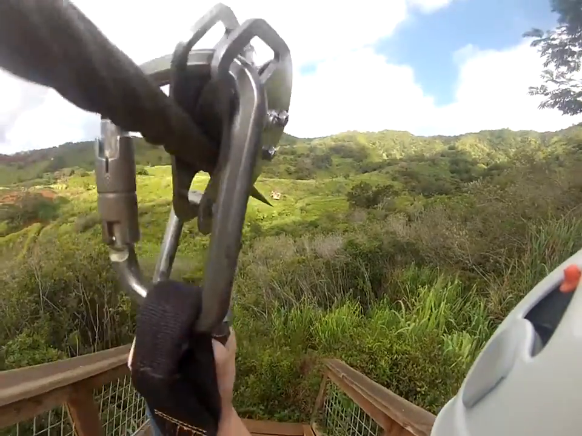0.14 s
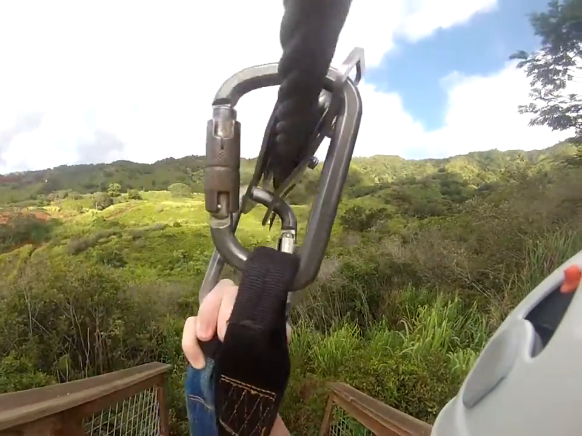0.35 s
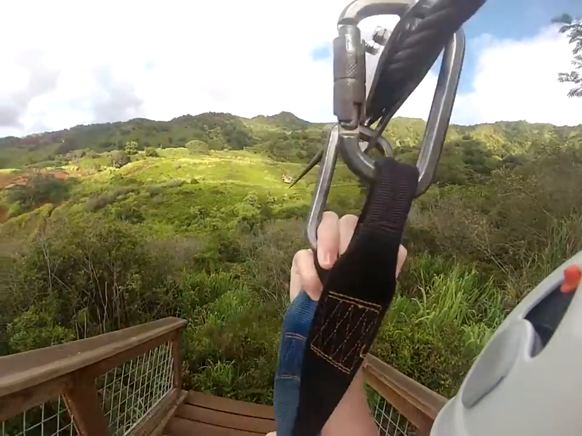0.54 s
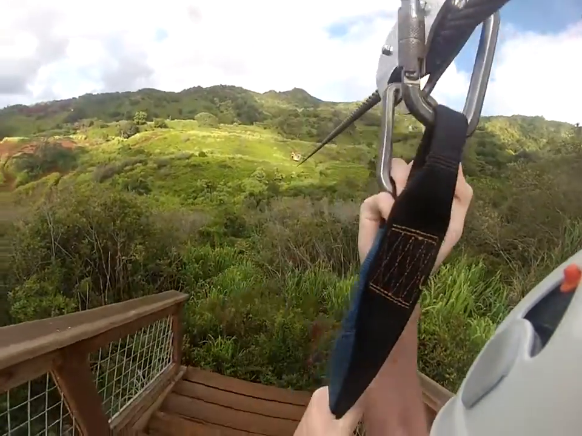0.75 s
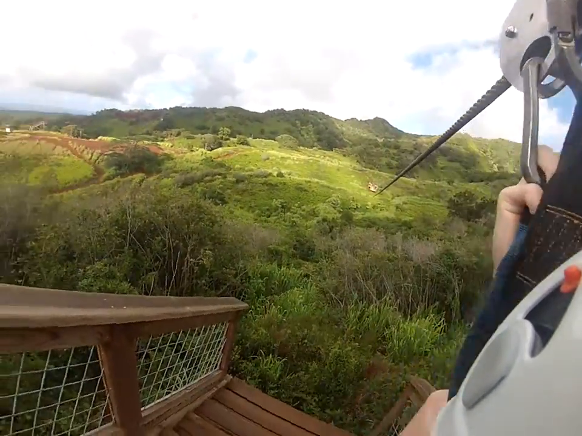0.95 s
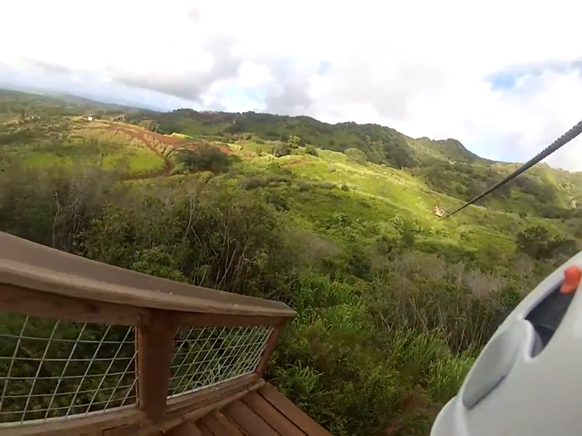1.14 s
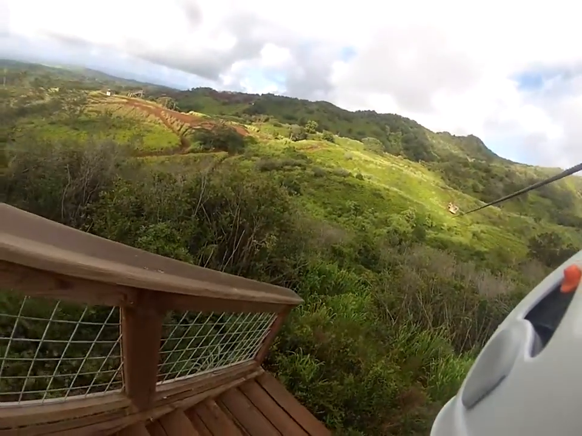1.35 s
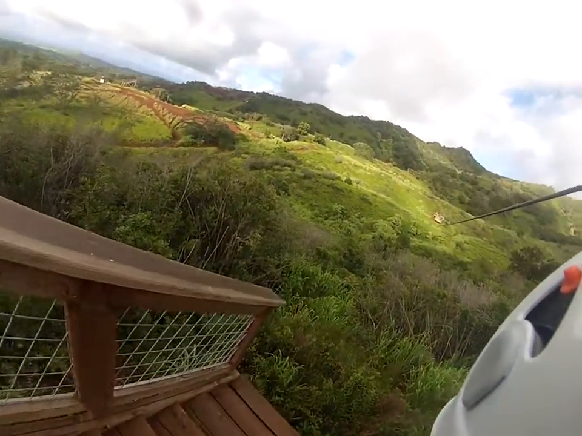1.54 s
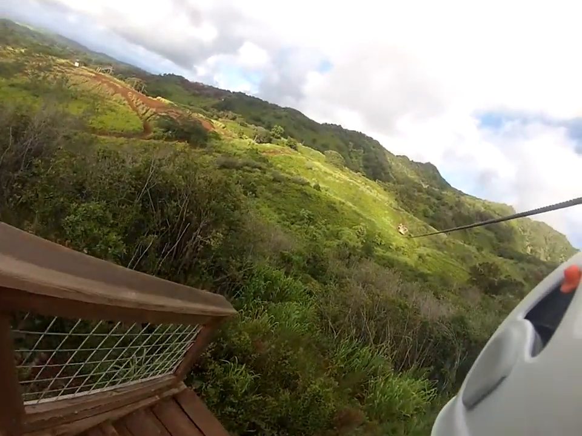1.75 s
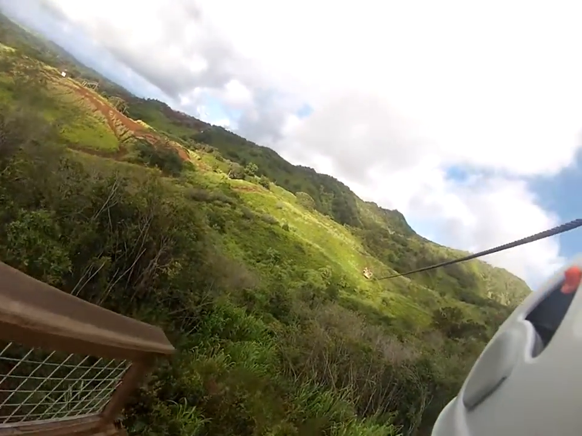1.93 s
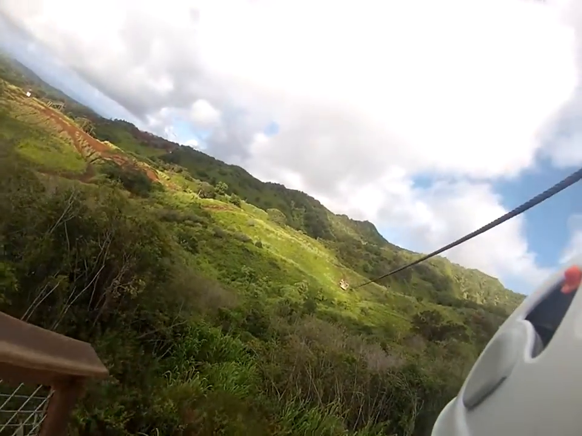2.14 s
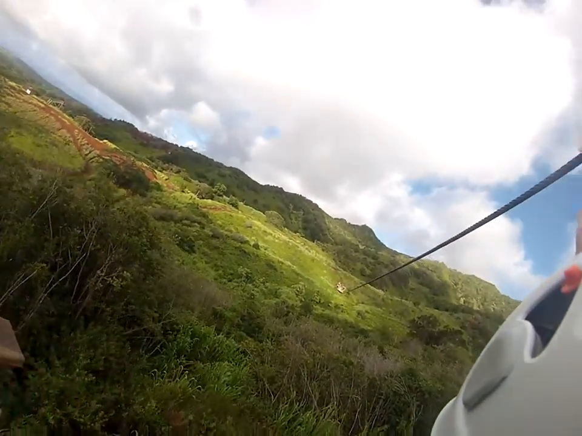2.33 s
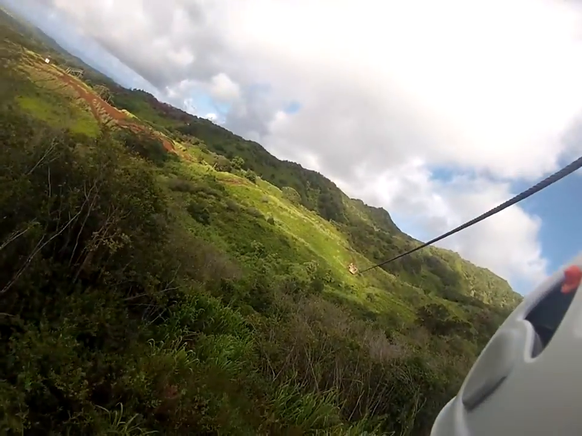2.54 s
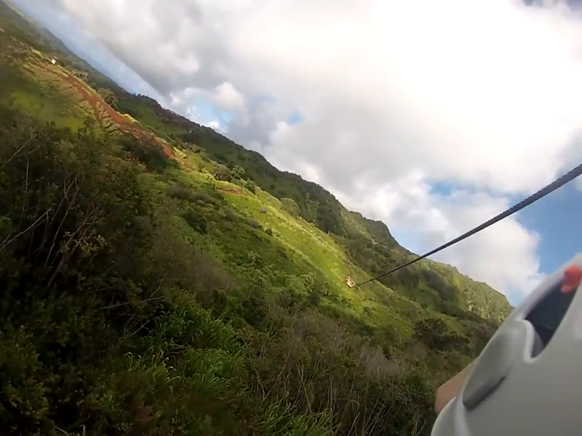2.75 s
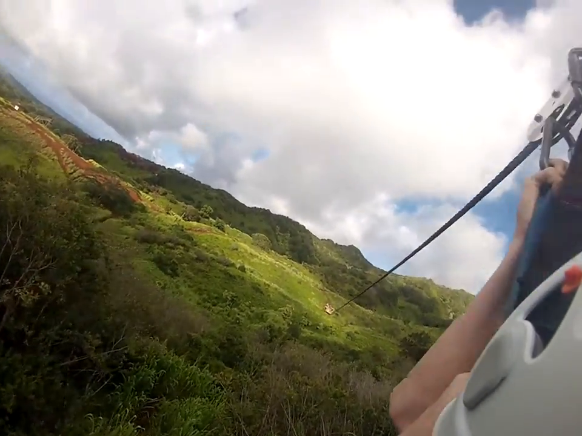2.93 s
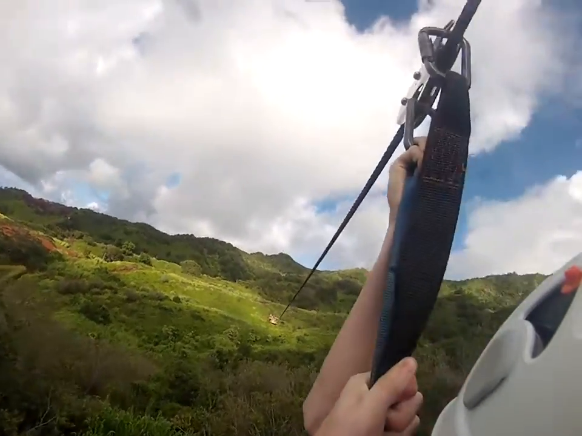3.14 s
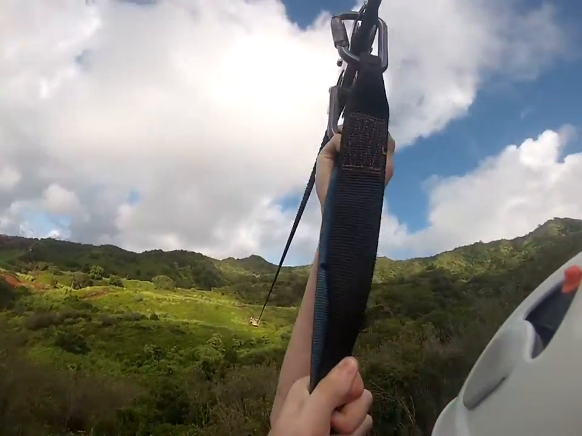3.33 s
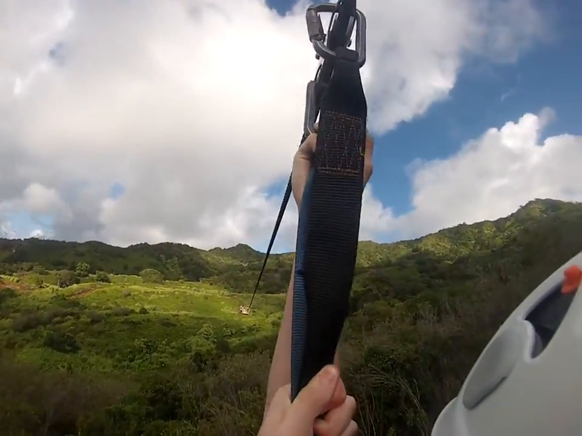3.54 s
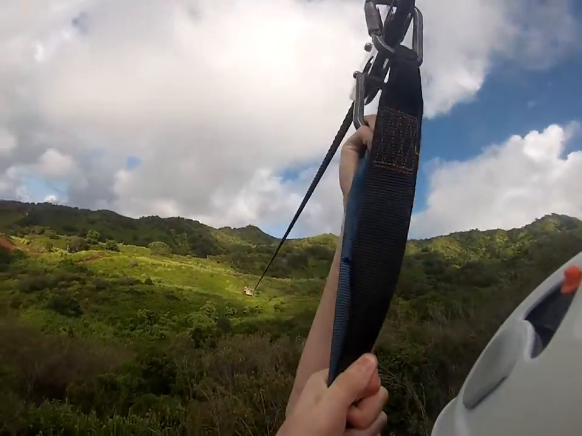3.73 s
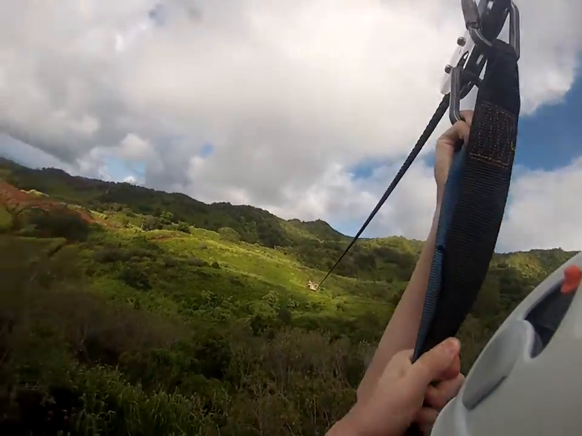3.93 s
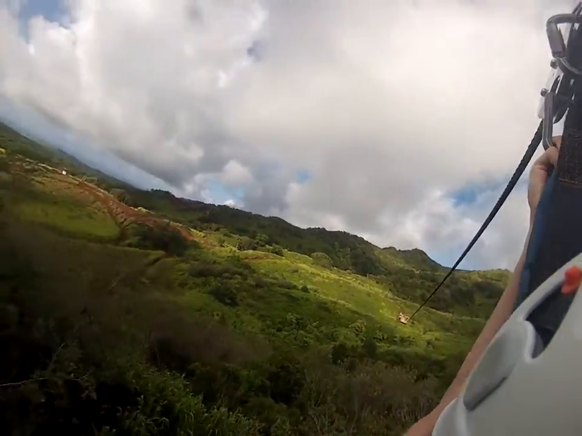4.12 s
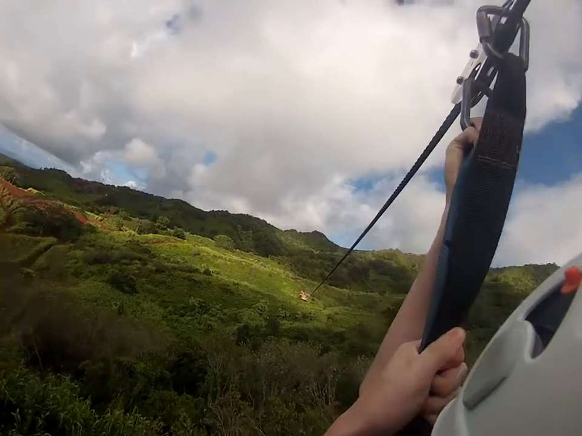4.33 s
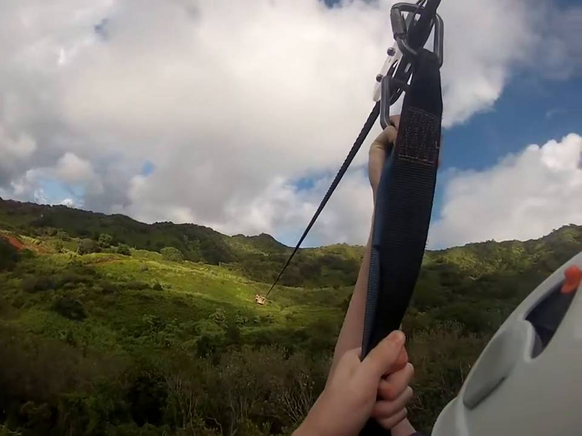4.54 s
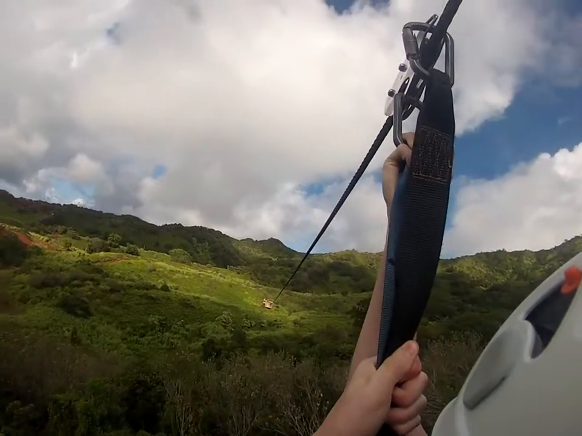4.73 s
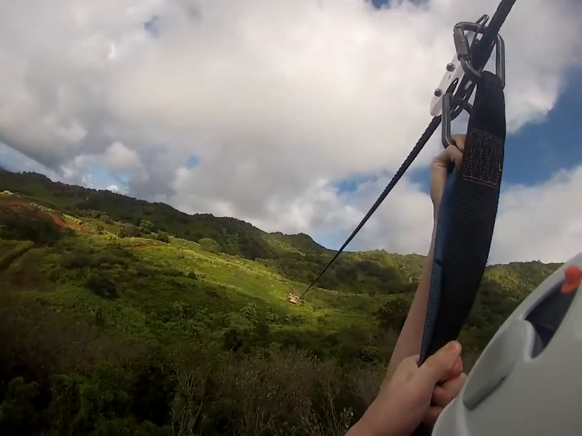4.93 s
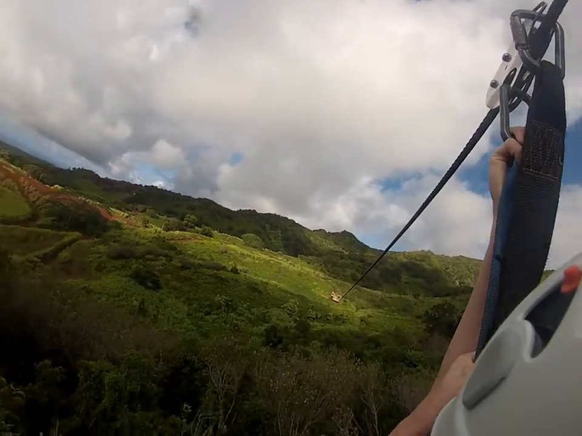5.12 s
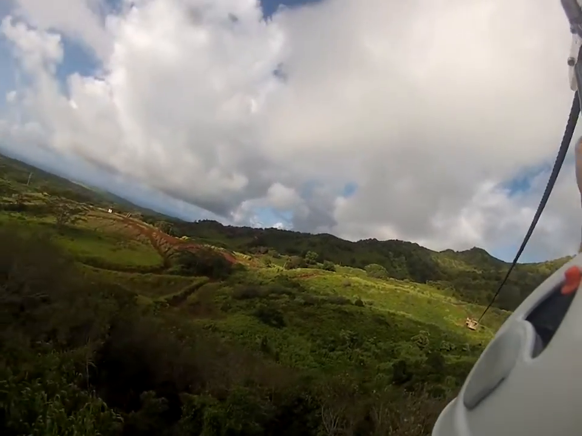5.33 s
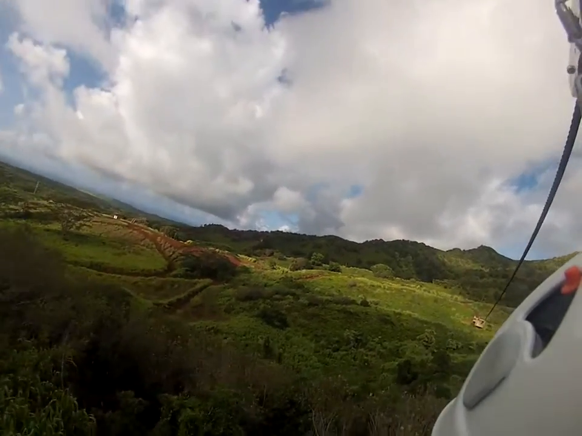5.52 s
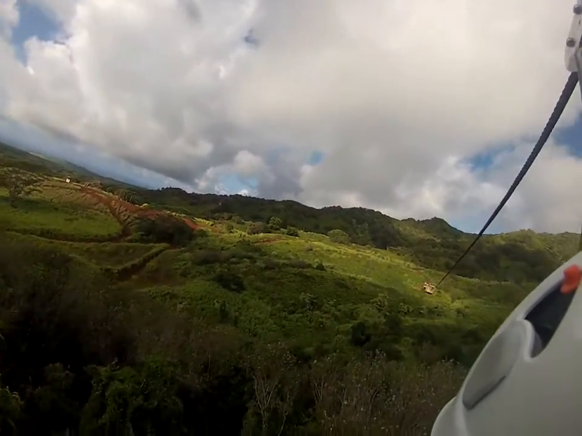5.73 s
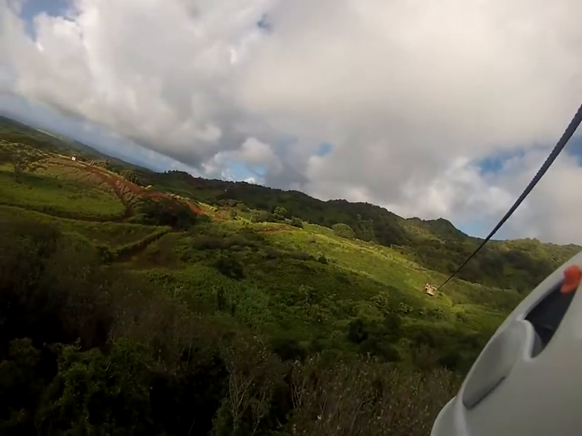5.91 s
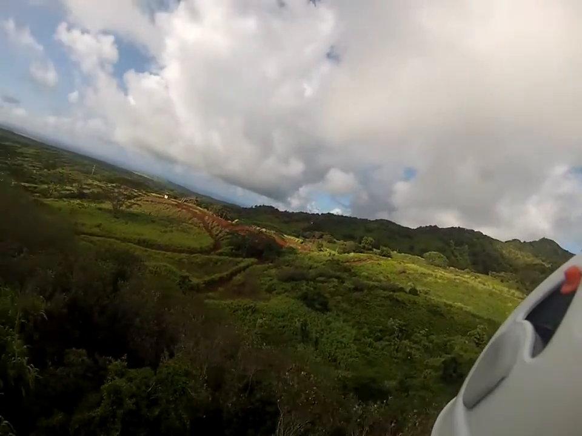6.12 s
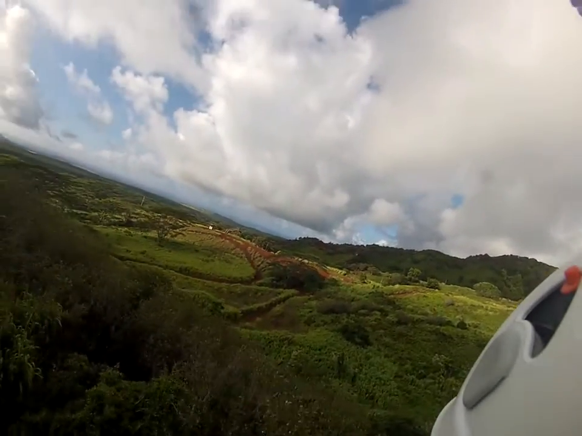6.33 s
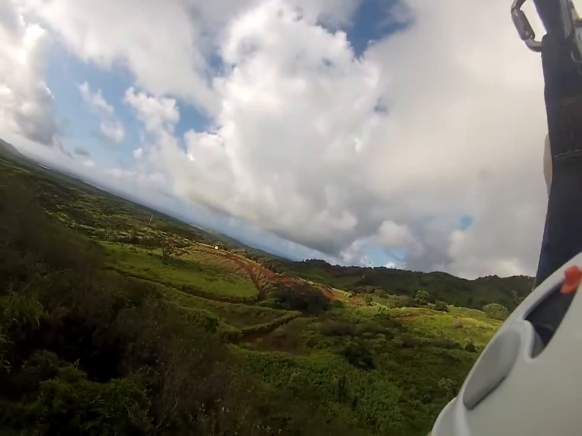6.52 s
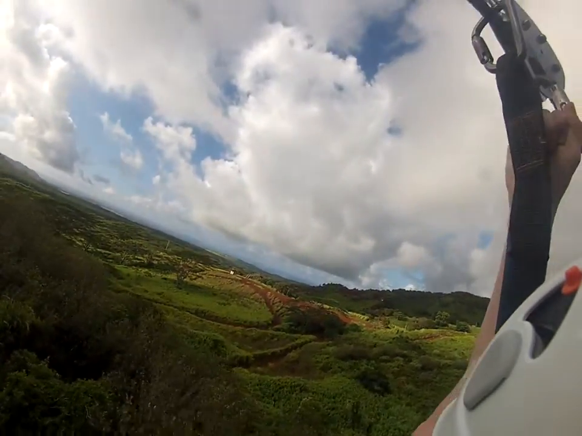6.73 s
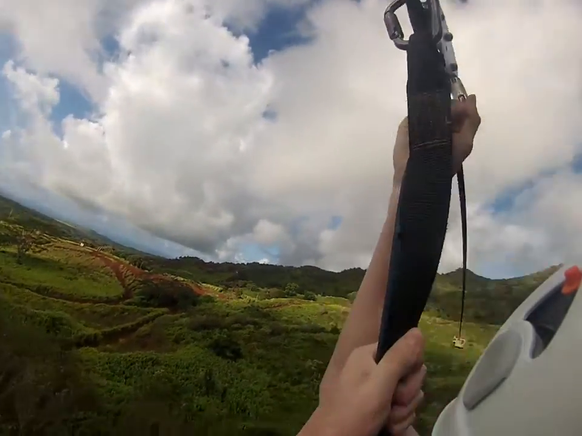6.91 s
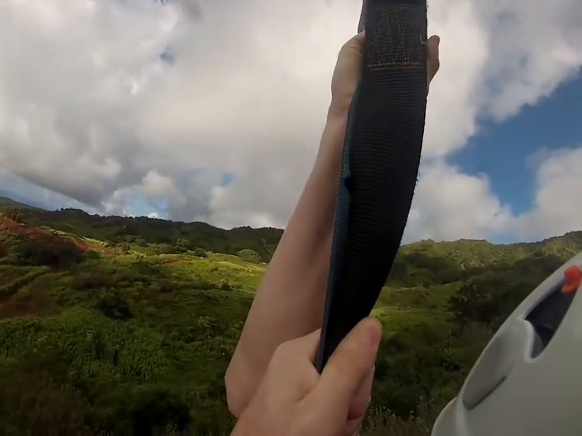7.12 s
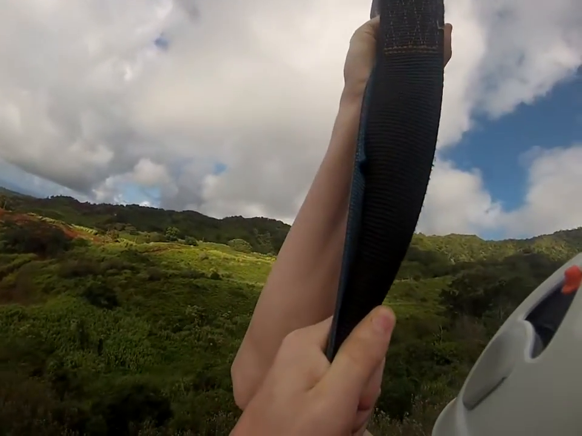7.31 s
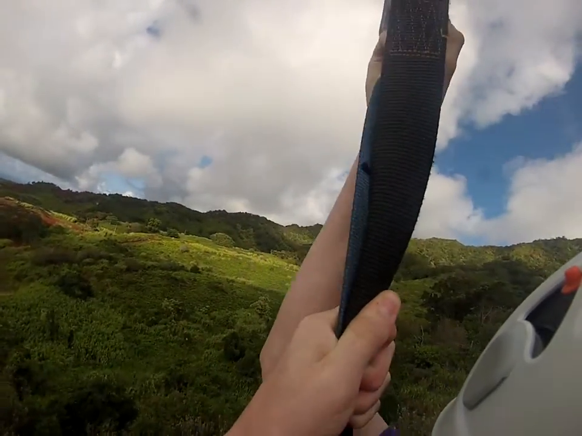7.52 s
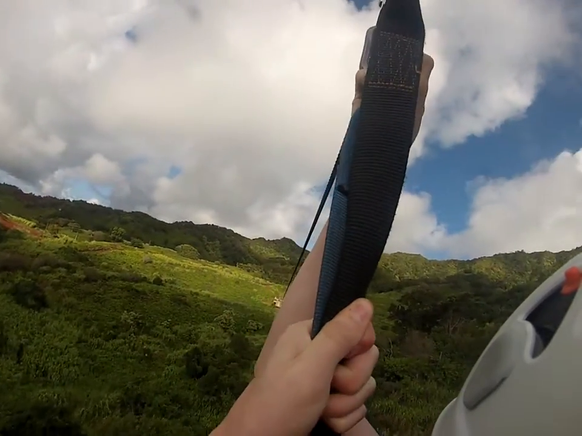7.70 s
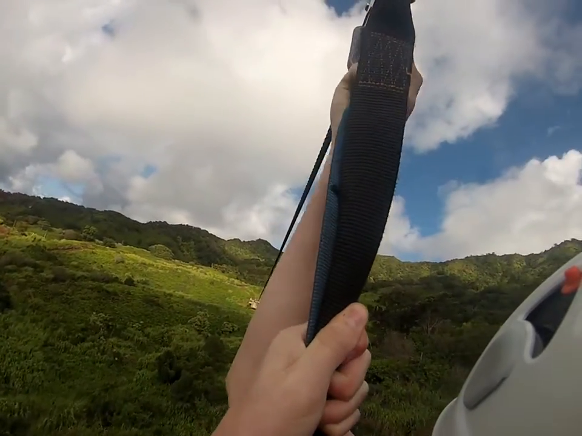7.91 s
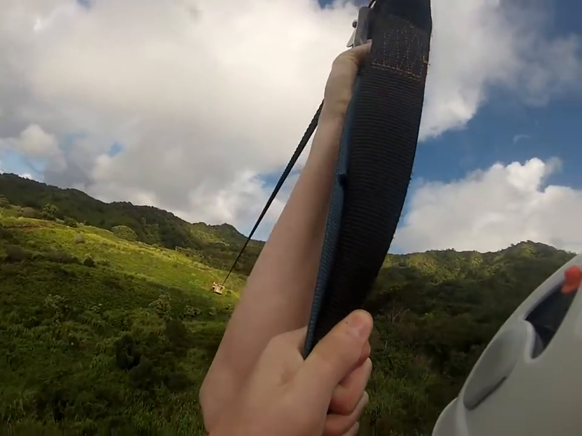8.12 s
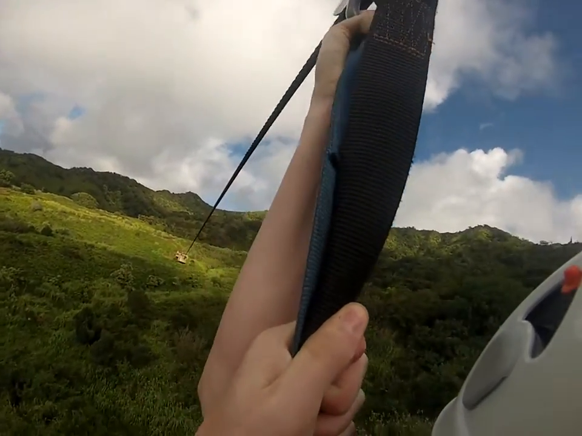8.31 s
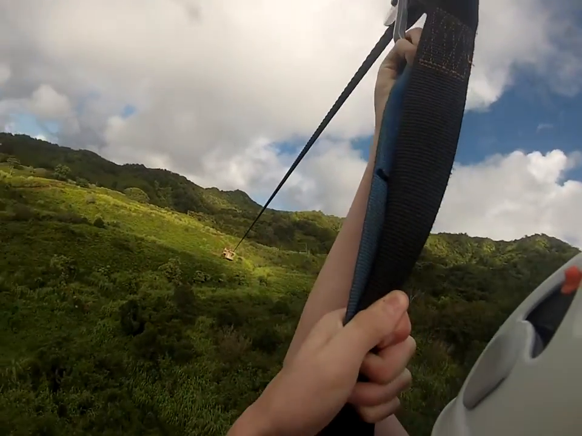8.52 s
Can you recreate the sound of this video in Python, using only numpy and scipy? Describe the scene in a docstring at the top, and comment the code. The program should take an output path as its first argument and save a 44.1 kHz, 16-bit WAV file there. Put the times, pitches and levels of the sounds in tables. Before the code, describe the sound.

A zip line rider shoves off with clinks, chirping ticks and knocks, then speeds away in a bright, hissing metal whir and buffeting wind.

```python
"""A zip line trolley whirs along a steel cable: strand bumps and grit drive the resonances of its metal.
Before that the rider shoves it off a wooden deck by hand, and single strands tick and chirp along the cable.
Struck resonances make the clinks of carabiners and the knocks of the helmet mount; webbing creaks.
Filtered noise makes the wind, which rumbles and buffets harder with speed and in gusts, over a faint hush."""
import sys
import numpy as np
from scipy import signal
from scipy.fft import rfft, irfft
from scipy.io import wavfile
from scipy.ndimage import uniform_filter1d

SR = 44100
rng = np.random.default_rng(int(sys.argv[2]) if len(sys.argv) > 2 else 0)


def dump_mix(stems):
    """Bounce the given channels to the path in sys.argv[1] as a 16-bit WAV at rate SR."""
    frames = np.atleast_2d(stems).T  # one column per channel
    limited = np.clip(frames, -1, 1)  # hard clip at full scale
    pcm = np.round(limited * 32767).astype(np.int16)
    wavfile.write(sys.argv[1], SR, pcm)


N = 377496
TIME = np.arange(N) / SR

# resonances of pulleys and side plates: [freq_hz, width_hz, moderate_speed_db, high_speed_db]
TROLLEY_MODES = [(1077, 214, -12, -22), (1344, 380, -14, -18.5), (1961, 122, -6.5, -43),
                 (2094, 246, -8.5, -5.5), (2354, 127, -11.5, -2.5), (2588, 335, -11, -10.5),
                 (2860, 580, -23.5, -17.5), (3598, 390, -13, -12.5), (3974, 157, -9, -3.5),
                 (4326, 171, -7, -6), (4590, 300, -9, -9), (4880, 270, -21.5, -25), (5374, 68, -1, -4),
                 (5700, 510, -8.5, -10), (5920, 1300, -19, -18), (6813, 91, -6, -10),
                 (6860, 110, -5, -30.5), (7700, 2200, -18.5, -12.5), (7635, 61, -6, -15),
                 (8080, 360, -7.5, -7.5), (8404, 300, -3.5, 0), (8860, 1380, -14, -12.5),
                 (9120, 190, -2.5, -26), (10430, 1280, -19.5, -18), (11240, 180, -15, -41),
                 (12050, 500, -30.5, -25), (11800, 490, -46, -56), (14000, 1000, -23, -60)]
# the pulleys' own sharp modes: [freq_hz, width_hz, level_db]
SINGING_MODES = [(5420, 86, 7.5), (6730, 176, 5.5), (8460, 330, 1), (8830, 110, -2), (3020, 760, -8)]
# share of the high-speed colour: [time_s, share_0_to_1]
FAST_SHARE = [(4.8, 0), (6.3, 0.72), (7.1, 0.45)]
# the head's turn away from the trolley: [time_s, turn_0_to_1]
HEAD_TURN = [(3, 1), (3.25, 0.37), (3.8, 0.17), (4.15, 1), (4.55, 0.44), (5.3, 1), (6.93, 0.95), (7, 0.06)]
# colour of the trolley at a full turn: [freq_hz, gain_db]
TURNED_COLOUR = [(850, 6), (1100, -4.5), (1420, 4.5), (1650, 6), (1850, 3), (2100, -2), (2600, 0.5),
                 (3050, 7.5), (3600, -9), (4500, -5), (5300, 3), (5900, -5.5), (6650, 3.5), (7200, -0.5),
                 (8200, 2), (11600, 1), (12300, 19.5), (13500, -4)]
# loudness of the whir: [time_s, level_db]
WHIR_LEVEL = [(1.36, -62), (1.496, -59), (1.66, -60), (1.75, -47.5), (2.02, -38), (2.14, -47.5),
              (2.18, -40), (2.72, -44), (2.76, -38.5), (2.99, -40), (4.96, -35.5), (6.07, -36.5),
              (6.95, -33), (6.99, -38.5), (7.2, -34), (7.818, -34.5), (7.862, -38.5), (8.444, -34),
              (8.54, -33)]
# treble beside the body: [strand_rate_hz, level_db]
SIZZLE_BY_SPEED = [(35, -0.5), (95, 4.5), (250, 4.5), (340, 2)]
# low end beside the body: base, rise per unit of whine, rise when the head faces the trolley
GROWL_DB, GROWL_DB_PER_WHINE, GROWL_FACING_DB = -15.5, 32, 1.5


def whir():
    """Rolling rings pulleys and side plates; colour shifts with speed and the turn of the head."""
    drive = rolling()
    fast, = np.clip(curves(FAST_SHARE), 0, 1)
    turn, = np.clip(curves(HEAD_TURN), 0, 1)
    moderate_modes = [(hz, width, db) for hz, width, db, _ in TROLLEY_MODES]
    fast_modes = [(hz, width, db) for hz, width, _, db in TROLLEY_MODES]
    metal = (1 - fast) * rung(drive, moderate_modes) + fast * rung(drive, fast_modes)
    metal = (1 - turn) * metal + turn * coloured(metal, TURNED_COLOUR)
    # slow, separate bumps let the sharp modes sing out
    singing_gain = np.interp(TIME, [1.6, 1.9, 3.3, 6], [0.69, 0.88, 0.062, 0.054])
    metal += singing_gain * rung(drive, SINGING_MODES)
    metal = coloured(metal, [(12500, 0), (13500, -9), (15000, -20)])

    strand_hz, = curves(SPEED)
    whine, = curves(WHINE_LEVEL)
    level_db, = curves(WHIR_LEVEL)
    growl_db = GROWL_DB + GROWL_DB_PER_WHINE * whine + GROWL_FACING_DB * (1 - turn)
    sizzle_db = np.interp(strand_hz, *np.transpose(SIZZLE_BY_SPEED))
    growl = gain_of(growl_db) * steadied(band(metal, 400, 1750), 0.13)
    body = steadied(band(metal, 1750, 5100), 0.13)
    sizzle = gain_of(sizzle_db) * steadied(band(metal, 5100, 16000), 0.13)
    # body and sizzle share one loudness
    heard = (growl + body + sizzle) / np.sqrt(1 + gain_of(sizzle_db) ** 2)
    onset = np.interp(TIME, [1.36, 1.42], [0, 1])
    return gain_of(level_db) * heard * onset


# speed as the rate of strands under the pulleys: [time_s, strand_rate_hz]
SPEED = [(1.38, 30), (1.7, 48), (1.95, 98), (3, 158), (4.9, 251), (6.8, 328), (8.56, 378)]
# strength of the strands' whine: [time_s, amplitude_beside_scrape]
WHINE_LEVEL = [(4.2, 0.057), (6.4, 0.011), (6.75, 0.24), (7.1, 0.14), (7.9, 0.035)]
STRANDS_PER_WHEEL_TURN = 6.3


def rolling():
    """Strand bumps and wire grit scrape the pulleys; overtones of the strand rate whine."""
    strand_hz, = curves(SPEED)
    speed = strand_hz / strand_hz.max()
    strands = np.cumsum(strand_hz * (1 + .005 * wander(15))) / SR
    since_bump_s = (strands % 1) / strand_hz
    bumps = np.exp(-since_bump_s / 0.0038) * gain_of(2 * wander(60))
    contact = 0.11 + 0.86 * speed + bumps
    rub = rng.standard_normal(N) + 0.93 * grit(per_s=3000, spread_db=1.5)
    scrape = steadied(contact * rub, 0.16)
    harmonics = sum(np.cos(2 * np.pi * k * strands) * gain_of(3 * wander(10) - 1) for k in (3, 4))
    whine = curves(WHINE_LEVEL)[0] * harmonics
    # the rim's flaws repeat every wheel turn: a fine comb of lines that follow the speed
    rim = rng.standard_normal(1024)
    comb = np.interp(strands / STRANDS_PER_WHEEL_TURN % 1, np.linspace(0, 1, len(rim)), rim)
    drive = scrape + whine + 0.66 * speed * comb
    flutter_db = 0.76 * wander(38) + .5 * wander(24)
    return along_cable(drive * gain_of(flutter_db), lag_s=.003)


def by_speed(rest_db, gained_db, power):
    """A level in dB that climbs with a power of the speed."""
    strand_hz, = curves(SPEED)
    return rest_db + gained_db * (strand_hz / strand_hz.max()) ** power


# ring of the cable under a slow pulley: [freq_hz, width_hz, level_db]
CABLE_MODES = [(1997, 95, 8.5), (2250, 60, 6.5), (2610, 82, 1), (3020, 72, -4), (3500, 73, -1.5),
               (4046, 160, 1.5), (4600, 110, -6), (5550, 550, -6), (6460, 140, -6), (8230, 390, -5.5)]
# shoves by hand; tick peaks are those before the cable spreads them:
# [start_s, length_s, strand_rate_hz, rise_hz_per_s, tick_peak_db, crackle_db, swell_db_per_s]
PUSHES = [(0.014, 0.13, 40.5, 0.5, -26, -48.5, -17), (0.2204, 0.14, 25.3, -0.5, -32.5, -61, 0),
          (0.3767, .39, 31.4, 66, -32, -56, 10), (1.055, 0.17, 27.5, -0.5, -39.5, -65.5, 6)]
PUSH_RELEASE_S, TICK_SCATTER_DB, TICK_DETUNE_RATIO = 0.047, 1, 0.017


def slow_pulleys():
    """Shoves make strands tick and wires crackle; the cable draws each tick into a chirp."""
    snap = [(2380, 1700, -8), (4260, 2200, -16), (7600, 2900, -14)]  # freq_hz, width_hz, level_db
    modes = CABLE_MODES + snap
    ticks, pressure = np.zeros(N), np.zeros(N)
    for start_s, length_s, hz, rise, tick_db, crackle_db, swell in PUSHES:
        t = np.clip(TIME - start_s, 0, length_s)
        strands = np.floor(hz * t + rise * t ** 2 / 2) + (TIME >= start_s)
        for s in TIME[1:][np.diff(strands) > 0]:
            # each slip favours other modes
            slip_modes = [(f * (1 + TICK_DETUNE_RATIO * rng.normal()), width, db + 4 * rng.normal())
                          for f, width, db in modes]
            peak_db = tick_db + TICK_SCATTER_DB * rng.normal()
            add(ticks, s - .0033, gain_of(peak_db) * peaked(ringing(slip_modes)))
        outside_s = abs(TIME - start_s - t)
        pressure += gain_of(crackle_db + swell * t) * np.exp(-outside_s / PUSH_RELEASE_S)
    friction = grit(per_s=170, spread_db=3) + .08 * rng.standard_normal(N)
    crackle = steadied(rung(friction, modes), 0.01) * pressure
    return along_cable(ticks + crackle, lag_s=.009)


# carabiners striking the trolley: [start_s, peak_db]
CLINKS = [(0.0102, -30.5), (0.0365, -29), (0.1517, -28.5), (0.63, -44), (0.7774, -36.5), (1.482, -41.5),
          (1.5893, -41), (1.6938, -30), (1.854, -34), (2.896, -27.5)]


def carabiners():
    """Short rattling contacts ring the trolley's modes, balanced anew for each clink."""
    out = np.zeros(N)
    for s, db in CLINKS:
        modes = [(hz, width, level + 3 * rng.normal()) for hz, width, level, _ in TROLLEY_MODES]
        contact = burst(.004) + .1 * burst(.018)
        add(out, s, gain_of(db) * peaked(signal.fftconvolve(ringing(modes), contact)))
    return out


# knocks in the helmet mount: [start_s, thud_peak_db, clack_peak_db]
KNOCKS = [(0.539, -38, -44), (0.917, -40, -48), (1.071, -43, -58), (1.088, -50, -42), (1.387, -35, -49),
          (1.706, -45.5, -50), (1.87, -46, -54), (2.345, -55, -41), (2.538, -56, -42.5),
          (2.996, -44.5, -48), (3.076, -40, -60), (3.108, -41, -56), (3.191, -34.5, -61), (3.221, -35, -63),
          (3.283, -37.5, -54), (4.685, -43, -40), (5.638, -52, -36.5), (7.757, -35.5, -40),
          (8.134, -53, -43)]
# the helmet's thud: [freq_hz, level_db, t60_s]
SHELL_MODES = [(242, 18.5, 0.12), (265, -12, 0.0089), (190, -19, .05)]
# the mount's plastic clack: [freq_hz, width_hz, level_db]
CLACK_MODES = [(480, 90, 2), (637, 220, 4.5), (914, 190, 1.5), (1490, 320, -8)]
# fainter knocks while stepping off the deck
JOSTLE_FROM_S, JOSTLE_TO_S, JOSTLE_THUD_DB, JOSTLE_CLACK_DB = 1.4, 2.2, -46.5, -49


def helmet_mount():
    """Each knock thuds the helmet shell's low modes and clacks the plastic mount."""
    out = np.zeros(N)
    jostle_times_s = rng.uniform(JOSTLE_FROM_S, JOSTLE_TO_S, size=3)
    jostles = [(s, JOSTLE_THUD_DB, JOSTLE_CLACK_DB) for s in jostle_times_s]
    for s, thud_db, clack_db in KNOCKS + jostles:
        add(out, s, gain_of(thud_db) * struck(SHELL_MODES, detune_ratio=0.057, rattle_s=0.0015))
        clack = signal.fftconvolve(ringing(CLACK_MODES), burst(0.0057))
        add(out, s, gain_of(clack_db) * peaked(clack))
    return out


# creaks of the harness: [start_s, length_s, pitch_hz, level_db]
CREAKS = [(0.869, 0.023, 1750, -65), (1.085, 0.011, 2400, -59), (1.254, 0.015, 2450, -55),
          (2.212, 0.032, 1530, -49)]


def webbing():
    """Brief swells of rubbing noise ring a narrow and a broad resonance at one pitch."""
    out = np.zeros(N)
    for s, length_s, hz, db in CREAKS:
        rub = rng.standard_normal(SR // 8)[:int(length_s * SR)]
        resonance = ringing([(hz, 300, 0), (hz, 2500, -14)])
        creak = signal.fftconvolve(rub * np.hanning(len(rub)), resonance)
        add(out, s, gain_of(db) * creak / np.std(creak[:len(rub)]))
    return out


# rumble colour near the deck: [freq_hz, level_db]
DECK_RUMBLE = [(6, -47), (18, 7), (30, -0.5), (45, -7), (62, -14.5), (90, -17), (140, -59), (300, -67)]
# rumble colour at speed: [freq_hz, level_db]
SPEED_RUMBLE = [(6, -40), (20, -3), (32, 0), (50, -4.5), (72, -8), (95, -16), (140, -32), (300, -60)]
# buffeting colour: [freq_hz, level_db]
BUFFET_COLOUR = [(40, -5), (70, 7.5), (100, 4), (150, -2.5), (220, -10), (320, -22), (430, -30.5),
                 (600, -42), (900, -48), (3000, -50)]
# gusts on the microphone: [start_s, length_s, rumble_lift_db, buffet_lift_db]
GUSTS = [(0.513, 0.15, 5, 9), (3.256, 0.86, 7, 19.5), (4.18, 0.7, 4, 17), (4.483, 0.067, 9.5, 3),
         (5.201, 1.265, 5, 16.5), (6.243, 0.059, 8, -4.5), (6.693, 0.357, 7, 6), (6.904, 0.72, 8, 12.5),
         (7.607, .75, 9, 7.5), (8.202, .06, -3, 9)]
GUST_PEAK_SHARE, GUST_ROUNDNESS = 0.3, 0.5  # one arch, peaking at this share of its length


def wind():
    """Big eddies rumble on the microphone, small ones buffet in lumps; speed and gusts lift both."""
    rumble_db = by_speed(rest_db=-40, gained_db=18.87, power=2.16)
    buffet_db = by_speed(rest_db=-56, gained_db=21.4, power=2.1)
    for s, length_s, rumble_lift_db, buffet_lift_db in GUSTS:
        phase = np.interp((TIME - s) / length_s, [0, GUST_PEAK_SHARE, 1], [0, 1, 0])
        arch = np.sin(np.pi / 2 * phase) ** GUST_ROUNDNESS
        rumble_db = rumble_db + rumble_lift_db * arch
        buffet_db = buffet_db + buffet_lift_db * arch
    rush = np.interp(TIME, [3, 6.9], [0, 1])
    rumble = steadied((1 - rush) * noise(DECK_RUMBLE) + rush * noise(SPEED_RUMBLE), 0.39)
    lumps = gain_of(4.4 * wander(22.8) + 4.2 * abs(rumble))
    buffet = steadied(noise(BUFFET_COLOUR) * lumps, 0.18)
    return gain_of(rumble_db) * rumble + gain_of(buffet_db) * buffet


# hush of open air: [freq_hz, level_db]
AIR_COLOUR = [(100, -13.5), (250, -10.5), (480, -16.5), (1300, -19), (2000, -21.5), (9500, -30.5),
              (11800, -36), (12400, -23.5), (13500, -33), (16000, -46)]
AIR_RMS_DB = -61.5


def open_air():
    """A steady faint hush of coloured noise."""
    return gain_of(AIR_RMS_DB) * noise(AIR_COLOUR)


def gain_of(db):
    """Decibels to amplitude."""
    return 10 ** (np.asarray(db) / 20)


def evened(x):
    """Scales to rms 1."""
    return x / np.sqrt(np.mean(x ** 2) + 1e-20)


def peaked(x):
    """Scales to peak 1."""
    return x / abs(x).max()


def steadied(x, seconds):
    """Scales to a running rms of 1, leaving faster flutter alone."""
    size = max(int(seconds * SR), 8)
    power = uniform_filter1d(uniform_filter1d(x ** 2, size), size)
    return x / np.sqrt(abs(power) + 1e-14)


def curves(rows):
    """Each column of a table at every sample."""
    s, *columns = np.transpose(rows)
    return [np.interp(TIME, s, c) for c in columns]


def add(mix, s, sound):
    """Mixes a sound in at a time."""
    part = mix[max(round(s * SR), 0):][:len(sound)]
    part += sound[:len(part)]


def coloured(x, points):
    """Filters by (freq_hz, gain_db) points."""
    hz, db = np.transpose(points)
    f = np.fft.rfftfreq(N, 1 / SR)
    return irfft(rfft(x) * gain_of(np.interp(np.log(f + 1), np.log(hz + 1), db)), N)


def noise(points):
    """Noise of rms 1 with a given spectrum."""
    return evened(coloured(rng.standard_normal(N), points))


def wander(hz):
    """Smooth chance of rms 1, up to a rate."""
    f = np.fft.rfftfreq(N, 1 / SR)
    return evened(irfft(rfft(rng.standard_normal(N)) / (1 + (f / hz) ** 4), N))


def grit(per_s, spread_db):
    """Random tiny impacts of uneven size, rms 1."""
    sizes = gain_of(spread_db * np.minimum(rng.exponential(1, N), 4))
    return evened(sizes * rng.choice([-1, 1], N) * (rng.random(N) < per_s / SR))


def burst(decay_s):
    """A rattling contact: noise that dies away exponentially."""
    t = np.arange(4096) / SR
    return rng.standard_normal(len(t)) * np.exp(-t / decay_s)


def ringing(modes, size=4096):
    """Minimum-phase response of steep resonances (freq_hz, width_hz, level_db), energy 1."""
    f = np.fft.rfftfreq(size, 1 / SR)
    power = sum(gain_of(db) ** 2 / (1 + (2 * (f - hz) / width) ** 2) ** 2 for hz, width, db in modes)
    log_gain = np.log(power + 1e-10) / 2
    mirrored = np.r_[log_gain, log_gain[-2:0:-1]]
    response = np.fft.ifft(np.exp(np.conj(signal.hilbert(mirrored)))).real
    return response / np.linalg.norm(response)


def rung(drive, modes):
    """A continuous drive heard through resonances."""
    return signal.oaconvolve(drive, ringing(modes))[:N]


def struck(modes, detune_ratio, rattle_s):
    """One blow of peak 1 on dying modes (freq_hz, level_db, t60_s)."""
    t = np.arange(SR // 4) / SR
    ring = sum(gain_of(db - 60 * t / t60) * np.sin(2 * np.pi * hz * (1 + detune_ratio * rng.normal()) * t)
               for hz, db, t60 in modes)
    return peaked(signal.fftconvolve(ring, burst(rattle_s)))


def band(x, lo_hz, hi_hz):
    """The part of a sound between two steep edges."""
    f = np.fft.rfftfreq(N, 1 / SR) + 1
    return irfft(rfft(x) / (1 + (lo_hz / f) ** 60) / (1 + (f / hi_hz) ** 60), N)


def along_cable(x, lag_s):
    """Bending waves in steel: treble arrives first; the lag is the delay at 1 kHz."""
    f = np.fft.rfftfreq(N, 1 / SR)
    return irfft(rfft(x) * np.exp(-4j * np.pi * lag_s * np.sqrt(1000 * f)), N)


def scene():
    """All sources reach the microphone as one sound, the same in both channels."""
    harness = carabiners() + helmet_mount() + webbing()
    centre = whir() + slow_pulleys() + harness + wind() + open_air()
    return np.array([centre, centre])


EDGE_HZ = 15100


def record(dry):
    """A limiter ducks peaks over each channel's ceiling and recovers steadily; then a band limit."""
    ceiling_db = np.array([[-9.5], [-8.5]])  # one channel ducks a little sooner
    recovery_db = 25 * TIME  # 25 dB per s
    peak_db = 20 * np.log10(abs(dry) + 1e-9)
    held_db = np.maximum.accumulate(peak_db + recovery_db, axis=1) - recovery_db
    over_db = np.maximum(held_db - ceiling_db, 0)
    smooth_over_db = uniform_filter1d(uniform_filter1d(over_db, size=128), size=128)
    limited = dry / gain_of(.85 * smooth_over_db)
    lowpass = signal.firwin(511, EDGE_HZ, window=("kaiser", 9), fs=SR)
    return signal.oaconvolve(limited, lowpass[None], "same")


dry = scene()
out = record(dry)
dump_mix(out)
```